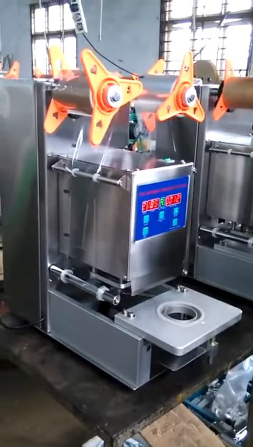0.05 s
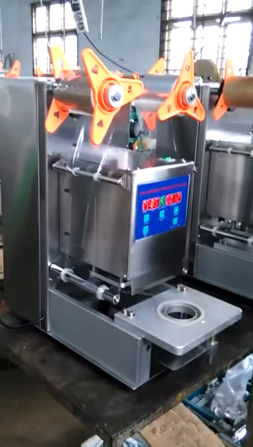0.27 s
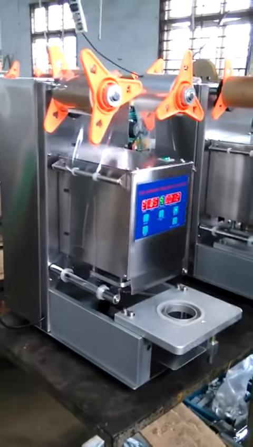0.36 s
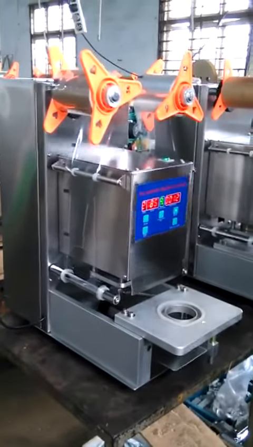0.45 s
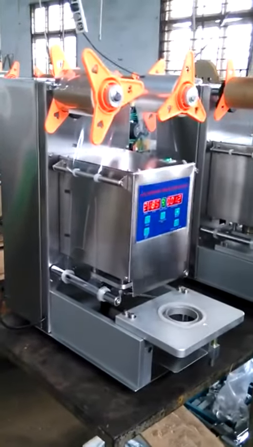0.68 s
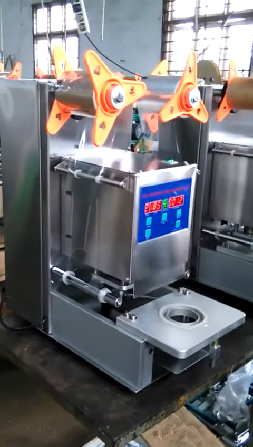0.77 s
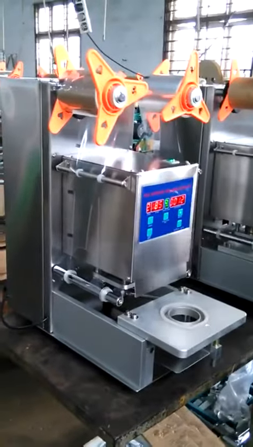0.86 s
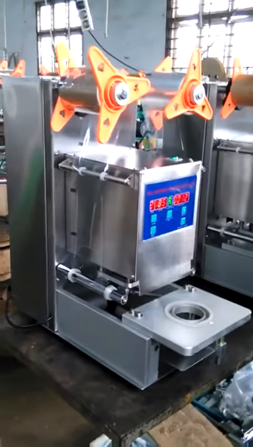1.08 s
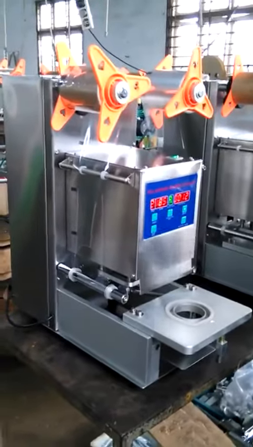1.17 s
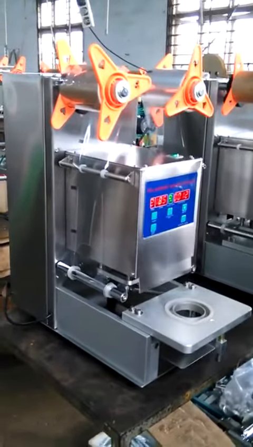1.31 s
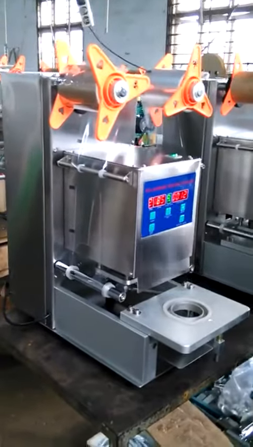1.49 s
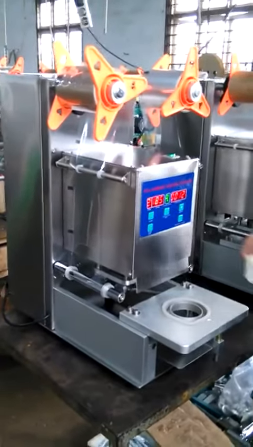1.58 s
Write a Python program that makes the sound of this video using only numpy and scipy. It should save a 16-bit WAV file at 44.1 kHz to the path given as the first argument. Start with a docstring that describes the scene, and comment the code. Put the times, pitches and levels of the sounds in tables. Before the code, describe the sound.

A shifting grip rumbles and thumps dully twice on a close microphone, followed by a brief scuff and soft, cloth-like swishes. Around it, a workshop carries the steady hiss and faint whine of idling machines.

```python
"""Handling noise in a workshop

Idle machines give a steady hiss and a faint motor whine around a hand-held phone.
The grip shifts in low shudders, and soft blows ring the damped housing: two dull thumps.
A short bright scuff follows, then two quiet swishes, probably cloth. Steel panels and
a bench add early reflections to the hiss, the scuff and the swishes."""
import sys
import numpy as np
from scipy import signal
from scipy.fft import rfft, irfft
from scipy.io import wavfile

SR = 44100
rng = np.random.default_rng(int(sys.argv[2]) if len(sys.argv) > 2 else 0)


def generate_wav(sig):
    """Save sig (samples, or channels by samples) to the path in sys.argv[1] as 16-bit PCM at SR."""
    pcm = np.round(np.clip(np.atleast_2d(sig).T, -1, 1) * 32767).astype(np.int16)
    wavfile.write(sys.argv[1], SR, pcm)


N = 72765


def undb(db):
    """Amplitude ratio of a level in decibels."""
    return 10 ** (np.asarray(db) / 20)


def shaped_noise(gain):
    """Spectral shaping: white noise weighted by gain(frequency), scaled to rms 1."""
    hz = np.maximum(np.arange(N // 2 + 1) * SR / N, 1)
    x = irfft(rfft(rng.standard_normal(N)) * gain(hz), N)
    return x / np.std(x)


def noise(spectrum):
    """Coloured noise of rms 1, its spectrum interpolated over log frequency."""
    hz, db = np.array(spectrum).T
    return shaped_noise(lambda f: undb(np.interp(np.log(f), np.log(hz), db)))


def wander(bandwidth_hz):
    """Random fluctuation: low-pass noise of rms 1."""
    return shaped_noise(lambda f: np.exp(-(f / bandwidth_hz) ** 2))


def burst(t, rise_s, fall_s):
    """Exponential growth to 1 at t = 0, then exponential decay."""
    return np.exp(np.where(t < 0, t / rise_s, -t / fall_s))


# Spectra of the room noise and the high hiss: frequency_hz, density_db
ROOM_SPECTRUM = [(60, 13), (150, -2.5), (210, 4.5), (310, -7), (490, 3.5), (680, -2.5), (950, -4.5),
                 (1300, 2), (1650, -5), (2300, -8.5), (3300, -11.5), (5000, -23.5), (11000, -24)]
HISS_SPECTRUM = [(1500, -4), (3500, -11.5), (5200, -9.5), (6800, -6.5), (7800, -3.5), (8700, 0.5),
                 (9600, -5), (10700, -9), (11500, -18)]
# Swell common to both: time_s, level_db
BACKGROUND_SWELL = [(0, 3), (.14, 0), (.22, 3.5), (.3, 2.5), (.37, 5.5), (.46, 1.5), (.59, 2.5), (.68, 0),
                    (.83, -1), (.95, 1.5), (1.08, 2), (1.2, 2), (1.28, -1.5), (1.38, 2), (1.45, 0.5),
                    (1.65, 0)]

def workshop(t):
    """Amplitude modulation: two broadband noises flicker separately and swell together."""
    room = undb(-42.5 + 0.5 * wander(7.3)) * noise(ROOM_SPECTRUM)
    hiss = undb(-42 + 0.5 * wander(45)) * noise(HISS_SPECTRUM)
    return (room + hiss) * undb(np.interp(t, *np.array(BACKGROUND_SWELL).T))


# Tones of the distant motors: pitch_hz, rms_level_db
MOTOR_TONES = [(199.2, -61), (459, -60), (538, -63.5), (619.5, -56.5), (774.5, -59), (1064.5, -68),
               (1180, -55), (1213, -61), (1277, -58.5), (1470, -65.5), (1528.5, -61.5), (1604, -58),
               (1681, -65), (2721, -65)]

def motors():
    """Superposition of sinusoids, each wavering slightly in frequency and amplitude."""
    drift_fraction, waver_db = 0.001395, 1.2
    out = np.zeros(N)
    for pitch_hz, level_db in MOTOR_TONES:
        hz = pitch_hz * (1 + drift_fraction * wander(5.54))
        phase = 2 * np.pi * (np.cumsum(hz) / SR + rng.random())
        out += np.sqrt(2) * undb(level_db + waver_db * wander(15)) * np.sin(phase)
    return out


# Spectrum of the hand's tremor: frequency_hz, density_db
TREMOR_SPECTRUM = [(15, 3), (35, 14), (70, -22), (140, -17), (300, -49), (900, -70)]
# Strength of the tremor: time_s, level_db
TREMOR_LEVELS = [(0, 2), (.6, 3.5), (.72, -7), (.82, -13), (.9, 6), (1.22, 5), (1.28, -15), (1.45, 2),
                 (1.65, -5)]
# Shifts of the grip: peak_s, level_db, upper_edge_hz, rise_s, fall_s
GRIP_SHIFTS = [(0.032, -27.5, 163, 0.015, 0.034), (0.088, -25, 139, 0.013, 0.0059),
               (0.179, -25, 164, 0.0072, 0.027), (0.238, -12.5, 67.5, 0.023, 0.057),
               (0.269, -11, 547, 0.0098, 0.007), (0.292, -16.5, 280, 0.017, 0.018),
               (0.321, -15, 145, 0.009, .008), (0.35, -21, 250, 0.012, 0.013),
               (0.399, -16.5, 372, 0.014, 0.0032), (0.402, -16.5, 95, 0.032, 0.016),
               (0.453, -28.5, 196, 0.011, 0.014), (0.516, -23.5, 64.5, 0.011, 0.013),
               (0.571, -27.5, 155, 0.0071, .016), (.945, -24.5, 46.5, 0.024, 0.016),
               (1.095, -32.5, 158, 0.0081, 0.017), (1.187, -36.5, 87, 0.0066, 0.017),
               (1.345, -24, 72, 0.028, 0.034), (1.381, -22.5, 59, 0.013, 0.021),
               (1.496, -28, 111, 0.013, .011), (1.574, -29.5, 74, 0.03, 0.011)]

def grip(t):
    """Structure-borne noise: the shifting grip adds low shudders to the hand's tremor."""
    lower_edge_hz, upper_order = 25, 3.62
    tremor_db = -39.5 + np.interp(t, *np.array(TREMOR_LEVELS).T)
    out = undb(tremor_db) * noise(TREMOR_SPECTRUM)
    for peak_s, level_db, upper_edge_hz, rise_s, fall_s in GRIP_SHIFTS:
        shudder = shaped_noise(lambda f: 1 / np.hypot(1, (lower_edge_hz / f) ** 2)
                               / np.hypot(1, (f / upper_edge_hz) ** upper_order))
        envelope = burst(t - peak_s, rise_s, fall_s)
        local_rms = np.sqrt(np.average(shudder ** 2, weights=envelope ** 2))
        out += undb(level_db) * envelope * shudder / local_rms
    return out


# Soft blows on the housing: start_s, level_db, pitch_hz, decay_s
HOUSING_BLOWS = [(0.2327, -10, 70, 0.0079), (0.243, -2, 153, 0.0074), (0.2543, -11, 172, 0.0058),
                 (0.2619, 3, 280.5, 0.0074), (0.2713, -1.5, 294, 0.0024), (.281, 0.5, 151, 0.0033),
                 (0.3851, 3, 133, 0.0034), (.395, -6, 270, 0.0036)]

def thumps(t):
    """Damped free vibration: each blow briefly rings two modes of the hand-held housing."""
    upper_ratio, upper_db, upper_decay_s = 2.03, -18.5, 0.0046
    contact_s, cutoff_hz = 0.0009, 800
    out = np.zeros(N)
    for start_s, level_db, pitch_hz, decay_s in HOUSING_BLOWS:
        age = np.maximum(t - start_s, 0)
        phase = 2 * np.pi * pitch_hz * age
        lower = np.exp(-age / decay_s) * np.sin(phase)
        upper = np.exp(-age / upper_decay_s) * np.sin(upper_ratio * phase)
        onset = 1 - np.exp(-age / contact_s)
        out += undb(level_db) * onset * (lower + undb(upper_db) * upper)
    return signal.sosfilt(signal.butter(2, cutoff_hz, fs=SR, output="sos"), out)


# Spectrum of the scuff: frequency_hz, density_db
SCUFF_SPECTRUM = [(400, -14), (1500, -25), (2500, 7), (3300, -16), (4200, -2), (4700, -4), (5600, 6.5),
                  (6300, -1), (6800, 10), (7500, -3), (8700, 4.5), (10500, -1), (11500, -21)]
# Its two strokes: peak_s, level_db, rise_s, fall_s
SCUFF_STROKES = [(0.508, -34, 0.0071, 0.023), (.533, -46, 0.0092, 0.018)]

def scuff(t):
    """Friction noise: a brief, bright rub."""
    envelope = sum(undb(level_db) * burst(t - peak_s, rise_s, fall_s)
                   for peak_s, level_db, rise_s, fall_s in SCUFF_STROKES)
    return envelope * noise(SCUFF_SPECTRUM)


# Spectra of a swish's body and treble: frequency_hz, density_db
BODY_SPECTRUM = [(200, -48), (500, 4.5), (900, -10), (1250, 1), (2000, 1.5), (2700, -1.5), (3300, -24),
                 (5000, -10.5), (10000, -40)]
TREBLE_SPECTRUM = [(2000, -21), (3500, -2), (4600, -8), (5700, 1.5), (6800, -5.5), (7500, 2), (8700, 5.5),
                   (10000, -1.5), (11500, -20)]
# Overlapping strokes of cloth: peak_s, rise_s, fall_s, body_db, treble_db
CLOTH_STROKES = [(1.111, 0.022, 0.017, -41, -38.5), (1.156, 0.031, 0.019, -37, -42.5),
                 (1.185, 0.022, 0.041, -38.5, -37.5)]

def cloth(t):
    """Friction noise in two bands: each stroke has a soft body and a bright edge."""
    body, treble = noise(BODY_SPECTRUM), noise(TREBLE_SPECTRUM)
    return sum(burst(t - peak_s, rise_s, fall_s) * (undb(body_db) * body + undb(treble_db) * treble)
               for peak_s, rise_s, fall_s, body_db, treble_db in CLOTH_STROKES)


def panels(direct):
    """Interference: early reflections from steel panels and the bench give a hollow colour."""
    echo_gain, decay_s = undb(-14), 0.017
    age = np.arange(N // 16) / SR
    echoes = rng.standard_normal(len(age)) * np.exp(-age / decay_s)
    reflected = signal.fftconvolve(direct, echoes / np.linalg.norm(echoes))[:N]
    return (direct + echo_gain * reflected) / np.hypot(1, echo_gain)


def saturate(x, ceiling=0.93, knee=6):
    """Soft saturation rounds off the highest peaks."""
    return x / (1 + np.abs(x / ceiling) ** knee) ** (1 / knee)


def scene():
    """Airborne and structure-borne sound add at one microphone."""
    t = np.arange(N) / SR
    handling = saturate(grip(t) + thumps(t))
    grain = undb(-wander(120))  # fast flutter with a spread of 1 dB
    friction = (scuff(t) + cloth(t)) * grain
    return (panels(workshop(t) + friction) + motors() + handling)[None]


def record(dry):
    """Band limiting: the phone's steep low-pass filter removes the highest treble."""
    cutoff_hz = 11600
    return signal.sosfilt(signal.ellip(10, 0.2, 80, cutoff_hz, fs=SR, output="sos"), dry)


dry = scene()
out = record(dry)
generate_wav(out)
```